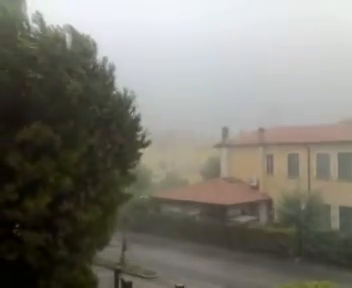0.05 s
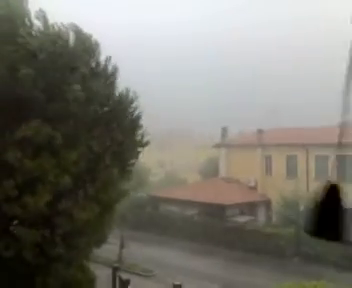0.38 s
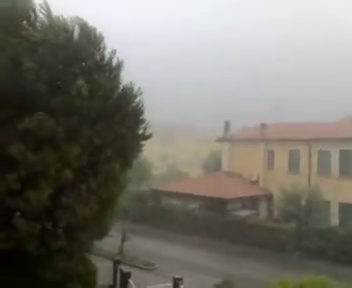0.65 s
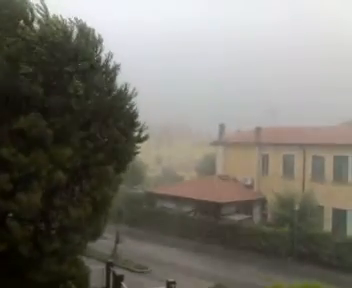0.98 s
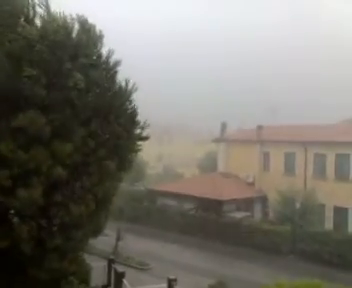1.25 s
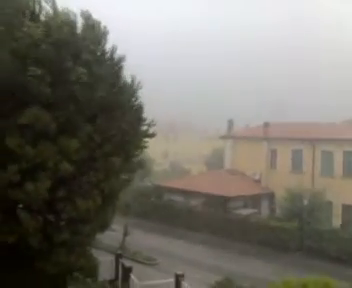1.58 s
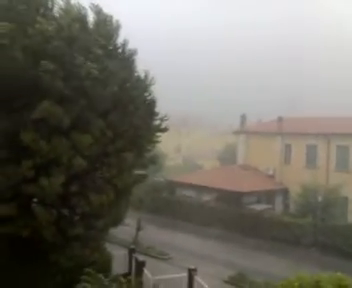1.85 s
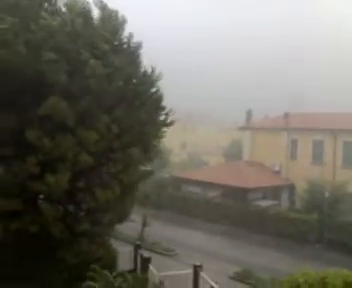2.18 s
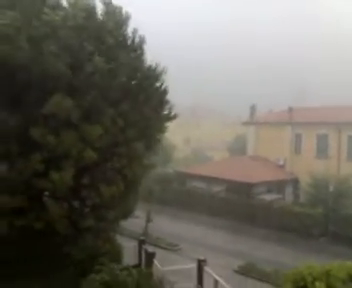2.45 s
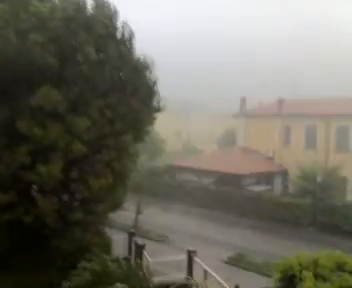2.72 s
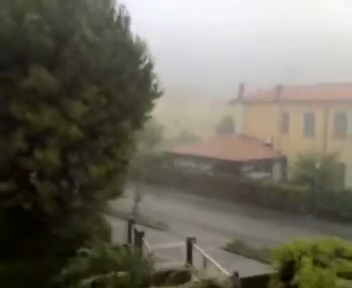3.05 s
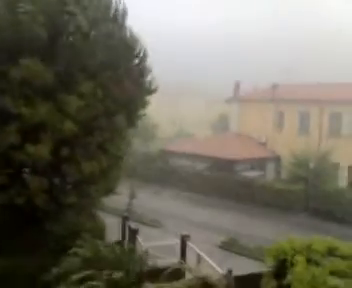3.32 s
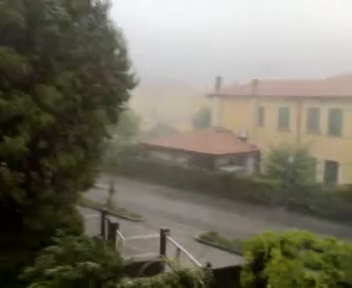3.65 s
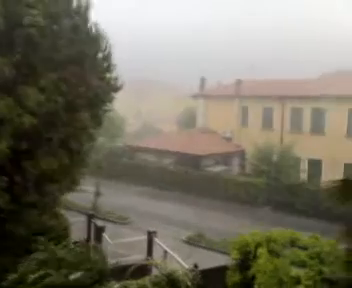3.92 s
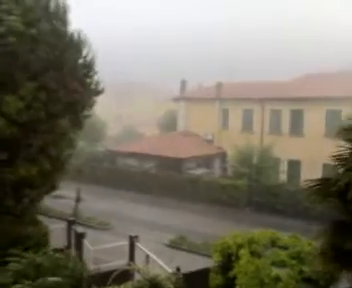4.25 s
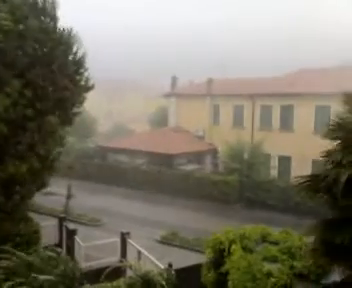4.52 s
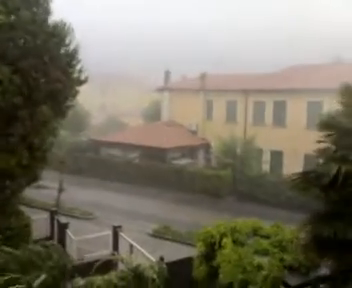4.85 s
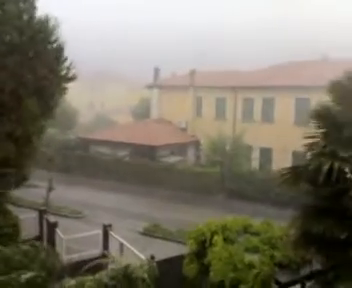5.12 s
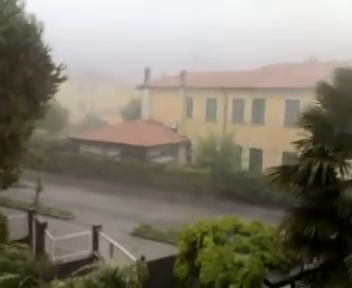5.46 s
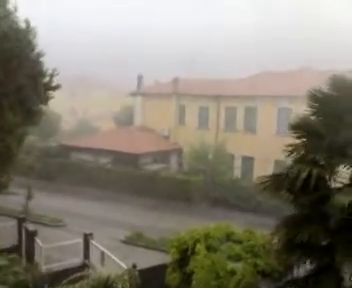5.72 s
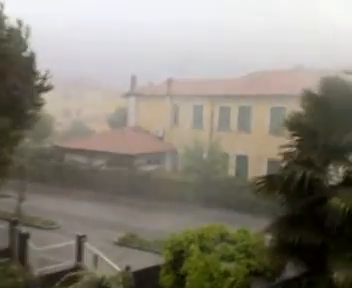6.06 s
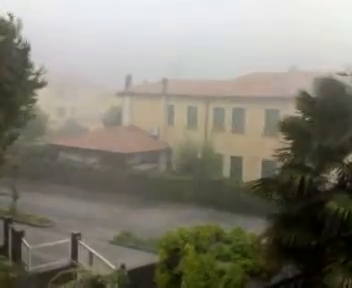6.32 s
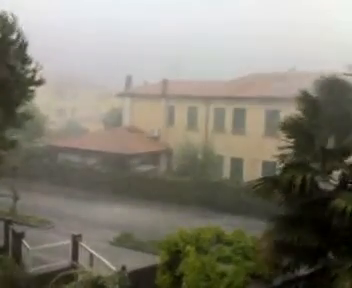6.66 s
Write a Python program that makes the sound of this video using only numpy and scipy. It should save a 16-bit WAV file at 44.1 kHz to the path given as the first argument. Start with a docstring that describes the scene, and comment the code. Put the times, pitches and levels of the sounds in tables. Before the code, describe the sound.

Heavy rain pours on a street, roofs and trees, making a dense roar and hiss. A low gust of wind rumbles on the microphone at the start, then eases. A few fat drops tap close by, and short wind thumps begin to hit the microphone. The buffeting grows stronger and more frequent near the end, briefly squashing the rain. It is heard in mono from a balcony.

```python
"""First you hear the roar of heavy rain and a low gust of wind, on a balcony over a street and gardens.
Countless drops merge into a roar on road and roofs and a hiss in the trees; the house wall echoes them.
Wind rumbles in the port (the small opening) of a mono microphone. From about two seconds on, a few
fat drops land close by and swirls of air thump the microphone. The hardest thumps overload the input
and choke the rain."""
import sys
import numpy as np
from scipy import signal
from scipy.fft import rfft, irfft
from scipy.io import wavfile
from scipy.ndimage import uniform_filter1d, map_coordinates

SR = 44100
rng = np.random.default_rng(int(sys.argv[2]) if len(sys.argv) > 2 else 0)


def wav_record(signal):
    """Record a signal, one row per channel, as 16-bit PCM in the file named by sys.argv[1]."""
    frames = np.transpose(np.atleast_2d(signal))
    bounded = np.clip(frames, -1, 1)
    # unit amplitude maps onto the largest positive 16-bit level
    quanta = np.round(bounded * 32767).astype(np.int16)
    wavfile.write(sys.argv[1], SR, quanta)


N = 304290
TIME = np.arange(N) / SR


def undb(db):
    """Turn decibels into a gain to multiply by."""
    return 10 ** (np.asarray(db) / 20)


def unit(x):
    """Scale a signal to an average size (rms) of 1."""
    return x / np.sqrt(np.mean(x ** 2))


def colour(x, points):
    """Make some pitches louder than others, following (f/Hz, level/dB) points; rms 1."""
    hz, db = np.transpose(points)
    f = np.maximum(np.arange(N // 2 + 1) * SR / N, 1)
    octaves_outside = np.maximum(np.log2(f / hz[-1]), 0) + np.maximum(np.log2(hz[0] / f), 0)
    curve_db = np.interp(np.log(f), np.log(hz), db) - 20 * octaves_outside
    return unit(irfft(rfft(x) * undb(curve_db), N))


def band(x, lo_hz, hi_hz, order=2):
    """Keep the pitches between two limits; rms 1."""
    sos = signal.butter(order, [lo_hz, min(hi_hz, SR / 2 - 1)], "band", fs=SR, output="sos")
    return unit(signal.sosfilt(sos, x))


def wander(per_second):
    """Drift smoothly from one random value to the next; rms 1."""
    step = int(SR / per_second)
    held = np.repeat(rng.standard_normal(N // step + 1), step)
    return unit(uniform_filter1d(uniform_filter1d(held, step), step)[:N])


def drops(per_second, spread_db):
    """Drops click at random moments: many small, few large."""
    falls = rng.random(N) < per_second / SR
    size = undb(spread_db * np.minimum(rng.exponential(size=N), 5))
    return unit(falls * size * rng.choice([-1, 1], N))


def shower(points, per_second, spread_db, wash_db, flicker_db):
    """Single drops over the smooth wash of distant ones; each pitch range flickers on its own."""
    rain = drops(per_second, spread_db) + undb(wash_db) * rng.standard_normal(N)
    spectrum = rfft(colour(rain, points))
    octave = np.log2(np.maximum(np.arange(len(spectrum)) * SR / N, 1))
    centres = np.arange(8.5, 13.1, .5)  # half-octave steps, about 360 to 8200 Hz
    out = 0
    for share in np.eye(len(centres)):
        pitch_range = irfft(spectrum * np.interp(octave, centres, share), N)
        out = out + pitch_range * undb(flicker_db * wander(45))
    return unit(out)


# How loud the rain sounds; near the end the recorder turns it down and wind fills the roar's range:
# t/s, roar level/dB, hiss level/dB, spray level/dB (all relative)
RAIN_LEVELS = [(0.0, -23, -21, -28.5), (0.27, -26.5, -22, -29), (1.65, -29, -23.5, -33),
               (1.96, -29.5, -23, -33), (3.5, -35, -23.5, -33), (3.94, -33, -21.5, -31.5),
               (4.96, -31.5, -21, -30.5), (5.98, -29.5, -20.5, -30), (6.23, -35, -24, -34.5),
               (6.53, -37, -24.5, -34.5), (6.76, -32.5, -25.5, -36.5), (6.9, -31, -32.5, -41)]
# The tone of the low roar, the higher hiss and the highest spray: f/Hz, level/dB
ROAR_TONE = [(80, -14.5), (170, -2.5), (280, 0), (430, 0.5), (560, -4), (670, 1), (760, -4), (870, 1.5),
             (1050, -3.5), (1450, -4.5), (2000, -17)]
HISS_TONE = [(400, -26), (900, -10), (1250, -4), (1600, -1.5), (1950, -0.5), (2450, -1), (2850, -5),
             (3300, -11), (4300, -22)]
SPRAY_TONE = [(2500, -20.5), (3300, -2.5), (3950, 1.5), (4500, -5), (5100, -3.5), (5850, -0.5), (6500, -6),
              (7100, -10.5), (7600, -21)]
# Sheets of rain driven through nearby leaves: middle t/s, rise in hiss level/dB
RAIN_SHEETS = [(4.22, 1), (5.13, 3), (5.54, 1.5), (5.84, 2.5), (6.04, 3.5)]


def downpour(roar_db=2.5, hiss_db=0.36, sheet_half_s=0.051, spray_share=0.45):
    """Far rain roars on hard ground, nearer rain hisses in leaves, the nearest drops add fine spray."""
    times, *levels = np.transpose(RAIN_LEVELS)
    roar_gain, hiss_gain, spray_gain = [undb(np.interp(TIME, times, db)) for db in levels]
    surge_db = sum(db * np.exp(-((TIME - s) / sheet_half_s) ** 2) for s, db in RAIN_SHEETS)
    roar = shower(ROAR_TONE, per_second=3000, spread_db=2.5, wash_db=5.5, flicker_db=0.74)
    hiss = shower(HISS_TONE, per_second=4000, spread_db=3.0, wash_db=1.5, flicker_db=0.88)
    spray = shower(SPRAY_TONE, per_second=2500, spread_db=3.0, wash_db=4.5, flicker_db=0.5)
    return (undb(roar_db) * roar_gain * roar
            + undb(hiss_db + surge_db) * hiss_gain * hiss
            + undb(spray_share * surge_db) * spray_gain * spray)


# The echo off the house wall as the microphone turns: t/s, delay/ms, strength (0 to 1)
WALL_ECHO = [(0, 1.29, 0.15), (1.5, 1.26, 0.16), (2.5, 1.25, 0.14), (3.3, 1.4, 0.06), (4.2, 1.59, 0.12),
             (5.4, 1.8, 0.06), (6.9, 1.64, 0)]


def add_wall_echo(rain):
    """The wall returns the rain a moment later, faintly changing its tone as the microphone moves."""
    times, delay_ms, strength = np.transpose(WALL_ECHO)
    delay_s = np.interp(TIME, times, delay_ms) / 1000
    echo = map_coordinates(rain, [(TIME - delay_s) * SR], order=3)
    return rain + np.interp(TIME, times, strength) * echo


# Gusts of wind: full strength from t/s, held for t/s, drone level/dB, rumble level/dB (both relative)
WIND_GUSTS = [(0, .2, -11, -26.5), (0.297, .73, -16.5, -23), (1.3, 0.28, -23, -34.5),
              (2.745, 0.35, -24, -23.5), (3.25, 0.084, -27, -26), (3.84, 0.67, -26.5, -26),
              (4.19, 0.039, -22, -22), (5.232, 0.26, -14.5, -20.5), (5.66, 0.53, -21, -18.5),
              (6.552, .34, -23, -16.5)]


def gusts(rise_s=0.08, fade_s=0.17, breeze_drone_db=-28, breeze_rumble_db=-38):
    """Each gust rises, holds and dies away to a steady breeze; gives the gains of drone and rumble."""
    drone_gain, rumble_gain = undb(breeze_drone_db), undb(breeze_rumble_db)
    for start, hold, drone_db, rumble_db in WIND_GUSTS:
        rise = np.clip(1 + (TIME - start) / rise_s, 0, 1)
        shape = rise * np.exp(-np.maximum(TIME - start - hold, 0) / fade_s)
        drone_gain = np.maximum(drone_gain, undb(drone_db) * shape)
        rumble_gain = np.maximum(rumble_gain, undb(rumble_db) * shape)
    return drone_gain, rumble_gain


# The tone of the wind's drone in the port and of its deeper rumble: f/Hz, level/dB
DRONE_TONE = [(50, -20.5), (90, -7), (125, 2.5), (160, 1.5), (195, 0.5), (240, -13), (400, -14), (560, -23),
              (1200, -44)]
RUMBLE_TONE = [(5, -4), (20, -4), (45, 1), (80, -1.5), (125, -6), (220, -13.5), (500, -32)]


def wind(rumble_db=3.0, swirls_db=-11, flutter_db=3.5, waver_db=1.0):
    """Rough air drones in the microphone port, its pressure rumbles, and small swirls flutter."""
    drone_gain, rumble_gain = gusts()
    drone = drone_gain * colour(rng.standard_normal(N), DRONE_TONE)
    rumble = undb(rumble_db) * rumble_gain * colour(rng.standard_normal(N), RUMBLE_TONE)
    flutter = band(rng.standard_normal(N), 100, 340) * undb(flutter_db * wander(50))
    swirls = undb(swirls_db) * rumble_gain * unit(flutter)
    return (drone + rumble + swirls) * undb(waver_db * wander(20))


# Fat drops landing close by: t/s, level/dB, ring f/Hz, ring width f/Hz, fade t/s
FAT_DROPS = [(2.172, -13.5, 5900, 450, 0.0063), (2.175, -18.5, 3200, 700, 0.013),
             (2.388, -17.5, 1710, 300, 0.027), (2.682, -19, 2800, 3000, 0.01),
             (4.365, -22, 4800, 2500, 0.01), (4.974, -20, 4930, 2500, 0.0061)]


def fat_drops(splash_db=-7):
    """A fat drop bursts with a splash, and the spot that it strikes rings briefly."""
    out = np.zeros(N)
    age = np.arange(SR // 8) / SR
    for s, db, hz, width, fade in FAT_DROPS:
        ring_noise, splash_noise = rng.standard_normal((2, len(age)))
        half_width = min(width, hz) / 2
        ring = band(ring_noise, hz - half_width, hz + half_width)
        splash = undb(splash_db) * band(splash_noise, 1500, 4300)
        start = int(s * SR)
        out[start:start + len(age)] += undb(db) * np.exp(-age / fade) * unit(ring + splash)
    return out


# Swirls of air that hit the microphone: middle t/s, half-length t/s, level/dB, top of the flutter f/Hz
WIND_THUMPS = [(2.757, .024, -2, 303), (2.864, .014, -8.5, 330), (2.9, .028, -12, 285),
               (2.969, 0.018, -11, 270), (3.039, .025, 2, 255), (3.089, 0.025, -10.5, 292),
               (3.872, 0.028, -15.5, 318), (4.394, .018, -15, 290), (5.031, 0.013, -6.5, 370),
               (5.877, .03, -4, 385), (6.096, .026, 2.5, 415), (6.158, 0.02, -5, 410),
               (6.2, 0.029, -12.5, 285), (6.291, 0.01, -0.5, 465), (6.557, 0.021, -10.5, 358),
               (6.688, 0.014, -1, 390), (6.734, .012, 2.5, 478), (6.777, .009, -10.5, 400),
               (6.83, .014, -5.5, 360), (6.868, .012, 1.5, 380)]


def wind_thumps(low_share=0.221, push_db=-5, push_stretch=2.36, tear_db=-19, sputter_db=3.5):
    """Each swirl is a short sputtering flutter with its own brightness, on a longer push of air."""
    out = np.zeros(N)
    t = np.arange(-SR // 4, SR // 4) / SR
    for s, half_length, db, hz in WIND_THUMPS:
        flutter_noise, push_noise, tear_noise, sputter_noise = rng.standard_normal((4, len(t)))
        shape = np.exp(-2 * (t / half_length) ** 2)
        sputter = undb(sputter_db * band(sputter_noise, 40, 160))
        flutter = band(flutter_noise, hz * low_share, hz, order=3) * unit(sputter)
        # the airflow tears into brighter noise at the peaks of the flutter
        tear = undb(tear_db) * band(tear_noise, hz, 3.9 * hz) * unit(sputter ** 2)
        push = np.exp(-2 * (t / half_length / push_stretch) ** 2) * band(push_noise, 16.5, 90.5)
        thump = unit(shape * (flutter + tear)) + undb(push_db) * unit(push)
        thump *= np.sqrt(np.mean(shape ** 2))  # so the level does not depend on the length
        start = int((s + t[0]) * SR)
        out[start:start + len(t)] += undb(db) * thump[:N - start]
    return out


def scene():
    """Rain and wind meet at one microphone."""
    return (add_wall_echo(downpour()) + fat_drops() + wind() + wind_thumps())[None]


def record(dry, ceiling=0.7, knee=5, top_hz=7450):
    """The input overloads softly, so hard thumps squash the rain; the highest pitches are cut off."""
    squashed = dry / (1 + np.abs(dry / ceiling) ** knee) ** (1 / knee)
    return signal.sosfilt(signal.ellip(10, .2, 70, top_hz, fs=SR, output="sos"), squashed)


dry = scene()
out = record(dry)
wav_record(out)
```